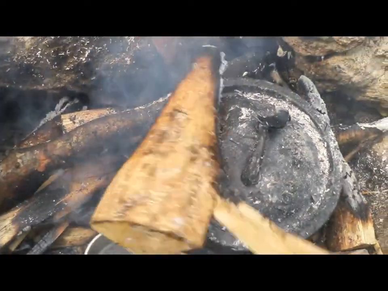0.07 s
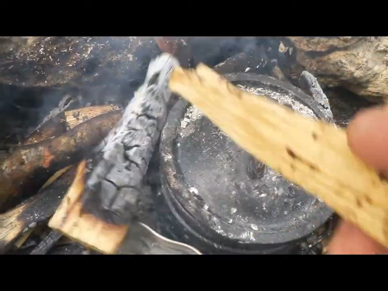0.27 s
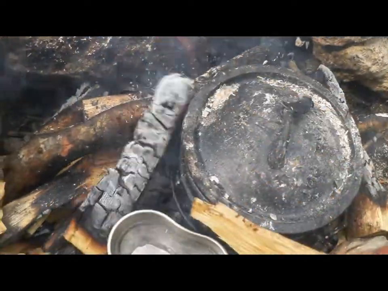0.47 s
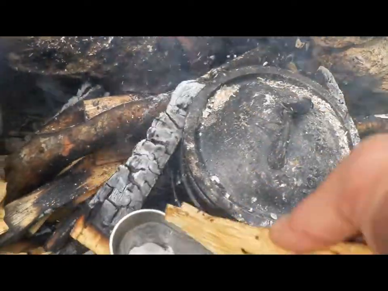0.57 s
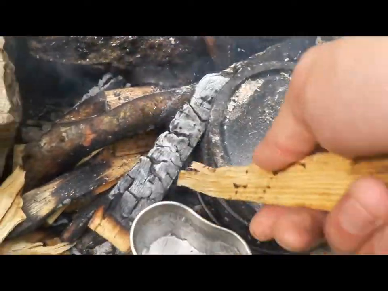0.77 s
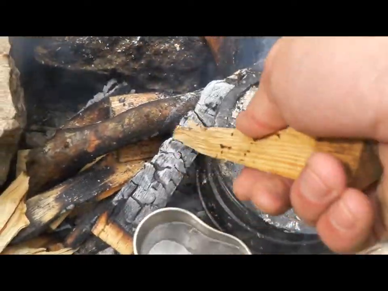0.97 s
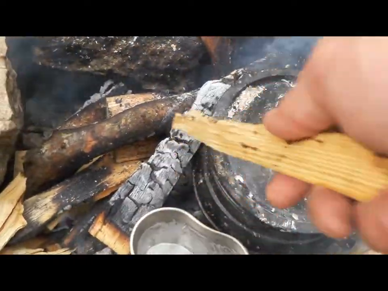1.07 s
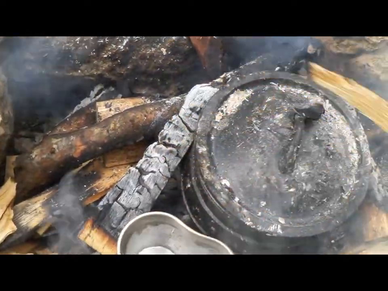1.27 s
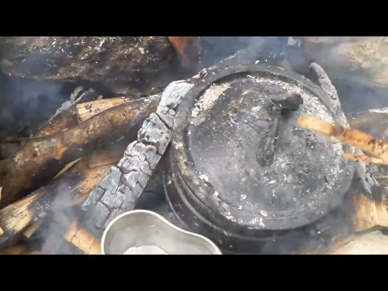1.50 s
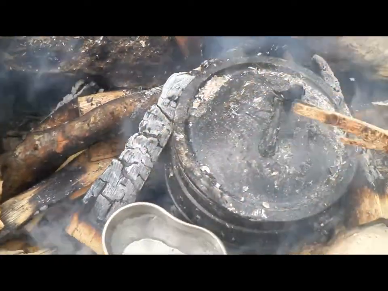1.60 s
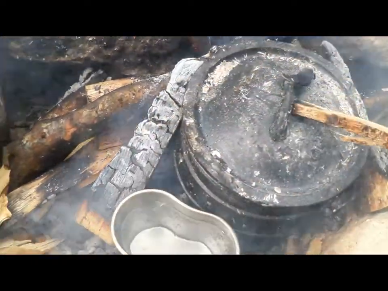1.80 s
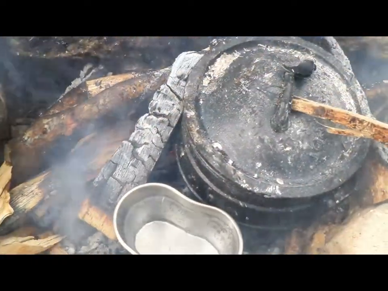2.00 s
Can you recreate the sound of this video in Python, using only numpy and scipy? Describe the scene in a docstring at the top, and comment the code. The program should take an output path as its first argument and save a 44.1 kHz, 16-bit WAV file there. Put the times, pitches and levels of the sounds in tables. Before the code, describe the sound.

Burnt wood scrapes, crunches and knocks against a metal pot in a campfire.

```python
"""A log settles in a campfire

A half-burnt log is pushed over: it scrapes, knocks against a metal pot and settles in the embers.
Each blow rings the wood, crushes a little char and stirs the pot; the hearth stones add a short echo.
Charcoal snaps and ticks, the hand-held microphone takes soft bumps, and an outdoor rush lies behind."""
import sys
import numpy as np
from scipy import signal
from scipy.fft import rfft, irfft
from scipy.io import wavfile

SR = 44100
rng = np.random.default_rng(int(sys.argv[2]) if len(sys.argv) > 2 else 0)


def wrap_up_sound(samples):
    """Save the sound to the file named by the first command line argument, as 16-bit audio."""
    columns = np.atleast_2d(samples).T
    # keep every value between -1 and 1, then stretch to whole-number steps
    tamed = np.clip(columns, -1, 1)
    steps = np.round(tamed * 32767).astype(np.int16)
    wavfile.write(sys.argv[1], SR, steps)


N = 90404


def undb(db):
    """Turn decibels into a number to multiply by."""
    return 10 ** (np.asarray(db) / 20)


def curve(points, x):
    """Gain along straight lines through (x, dB) points."""
    return undb(np.interp(x, *np.array(points).T))


def gains(points):
    """Gain at each frequency, from (Hz, dB) points."""
    hz, db = np.array(points).T
    return undb(np.interp(np.log(np.fft.rfftfreq(2 * N, 1 / SR) + 1), np.log(hz), db))


def colour(x, points):
    """Change the tone of a sound; white noise keeps its power."""
    gain = gains(points)
    cepstrum = irfft(np.log(gain / np.sqrt(np.mean(gain ** 2))))
    cepstrum[1:N] *= 2  # folded so the filter rings only after a sound, never before
    cepstrum[N + 1:] = 0
    return irfft(rfft(x, 2 * N) * np.exp(rfft(cepstrum)))[..., :N]


def spread(pair, width):
    """Make left and right from a mid signal (shared) and a side signal (opposite in each ear)."""
    side = irfft(rfft(pair[1], 2 * N) * gains(width))[:N]
    return np.array([pair[0] + side, pair[0] - side])


def since(start):
    """Seconds since a moment, zero before it."""
    return np.maximum(np.arange(N) / SR - start, 0)


def convolve(x, response):
    """Let every sample set off a ring or an echo."""
    return signal.fftconvolve(np.atleast_2d(x), np.atleast_2d(response), axes=-1)[:, :N]


def ring(modes):
    """The tones of a struck object; each fades by 60 dB in its ring time."""
    t = since(0)[:SR // 2]
    return sum(undb(db - 60 * t / ring_s) * np.sin(2 * np.pi * hz * t) for hz, db, ring_s in modes)


def grains(per_second, spread_db=3.5):
    """Two streams of tiny cracks of uneven size, scaled to a power of 1."""
    size = undb(spread_db * np.clip(rng.standard_normal((2, N)), -2, 2))
    happens = rng.random((2, N)) < per_second / SR
    cracks = happens * np.sign(rng.standard_normal((2, N))) * size
    return cracks / cracks.std()


# tone of the outdoor rush (frequency [Hz], relative level [dB])
RUSH_TONE = [(18, -46), (30, -29.5), (127, -9.5), (319, -6), (355, -11), (486, -10), (684, -8),
             (1630, -3.5), (1810, -7), (2170, -10.5), (3220, -16), (7270, -21), (8080, -24), (14000, -31),
             (16000, -37)]
# how loud the rush is (time [s], level [dB])
RUSH_LEVEL = [(0, -44.5), (.6, -43), (1.2, -43.5), (1.4, -46), (1.65, -45.5), (2.05, -45)]
# brief swells in the rush (peak time [s], half length [s], frequency [Hz], level [dB])
RUSH_SWELLS = [(1.185, 0.11, 1450, -48.5), (1.65, 0.16, 2440, -51)]
# how wide the rush sounds (frequency [Hz], side compared with mid [dB])
RUSH_WIDTH = [(100, -57.5), (600, -14), (1500, -2.5), (4000, -4), (12000, -2)]


def outdoors():
    """A soft, wide rush with short swells at middle pitches."""
    rush = curve(RUSH_LEVEL, since(0)) * colour(rng.standard_normal((2, N)), RUSH_TONE)
    for peak, half_length, hz, db in RUSH_SWELLS:
        noise = colour(rng.standard_normal((2, N)), RUSH_TONE)
        band = signal.lfilter(*signal.iirpeak(hz, Q=2.5, fs=SR), noise)
        rush += undb(db) * np.exp(-((since(0) - peak) / half_length) ** 2) * band / band.std()
    return spread(rush, RUSH_WIDTH)


# rumble of the hand shifting its grip (time [s], level [dB])
GRIP_LEVEL = [(0, -76), (.1, -44.5), (.35, -49), (.65, -41.5), (.9, -42), (1.07, -40), (1.14, -56),
              (1.35, -73), (1.8, -54), (1.9, -76)]
# tone of that rumble (frequency [Hz], relative level [dB])
GRIP_TONE = [(20, -39), (60, -6.5), (120, 2.5), (240, -2.5), (400, -17.5), (760, -15.5), (1200, -46.5)]
# bumps on the microphone's case (time [s], level [dB], pitch at the bump's loudest moment [Hz])
CASE_BUMPS = [(0.109, -32, 142), (0.116, -32.5, 226), (0.158, -33.5, 180), (.215, -40, 252),
              (0.447, -32.5, 206), (.545, -27, 179), (.668, -20.5, 231), (0.676, -23.5, 126),
              (0.719, -47, 198), (.728, -26, 234), (0.74, -35, 110), (0.781, -35.5, 242), (0.85, -22, 259),
              (.863, -17.5, 213), (0.88, -27.5, 313), (.882, -17.5, 137), (0.925, -27, 150),
              (0.954, -25.5, 233), (0.967, -28.5, 116), (0.99, -36, 147), (1.008, -32, 136),
              (1.034, -31, 103), (1.064, -25.5, 218), (1.422, -36.5, 140), (1.544, -43, 135),
              (1.595, -38.5, 166)]


def handling(rise_s=0.0055, pitch_sag=0.09, port_hz=350, port_db=-2):
    """The hand rumbles and bumps on the microphone; its case resonates at the right-hand opening."""
    thuds = curve(GRIP_LEVEL, since(0)) * colour(rng.standard_normal(N), GRIP_TONE)
    for start, db, hz in CASE_BUMPS:
        age = since(start) / rise_s  # 1 at the bump's peak
        cycles = hz * rise_s * age * (1 + pitch_sag) / (1 + pitch_sag * age / 2)
        thuds += undb(db) * (age * np.exp(1 - age)) ** 2 * np.sin(2 * np.pi * cycles)
    right_port = signal.lfilter(*signal.iirpeak(port_hz, Q=1.7, fs=SR), thuds)
    return np.array([thuds, thuds + undb(port_db) * right_port])


# how wide the fire sounds (frequency [Hz], side compared with mid [dB])
FIRE_WIDTH = [(100, -45), (400, -16), (700, 1), (1400, -9), (5000, -10), (9000, -4), (15000, -1)]


def close_by(pair):
    """Spread a sound from the nearby fire between the ears."""
    return spread(pair, FIRE_WIDTH)


# tone of the embers (frequency [Hz], relative level [dB])
EMBER_TONE = [(500, -36), (3000, -1), (8000, 5), (16000, -4)]


def embers(level_db=-67.5):
    """Glowing wood crackles faintly at random."""
    return undb(level_db) * close_by(colour(grains(per_second=70), EMBER_TONE))


# tone of the echo (frequency [Hz], relative level [dB])
ECHO_TONE = [(100, 1), (2500, -8.5), (7000, -14.5), (15000, -8.5)]


def hearth(sound, echo_db=-13, ring_s=0.095, delay_s=0.002):
    """Stones and logs around the fire scatter the sound, adding a short echo."""
    t = since(delay_s)
    tail = rng.standard_normal((2, N)) * (t > 0) * undb(-60 * t / ring_s)
    tail /= np.sqrt(np.sum(tail[0] ** 2))
    echo = close_by(colour(tail, ECHO_TONE))
    return sound + undb(echo_db) * convolve(sound.mean(axis=0), echo)


# charcoal snaps (time [s], level [dB], centre pitch [Hz], pitch spread [octaves], fade time [s])
CHARCOAL_SNAPS = [(0.0502, -26.5, 7900, 1, 0.0029), (0.0565, -29.5, 3630, 0.45, 0.0055),
                  (.079, -32, 9100, 0.51, 0.0024), (0.169, -32, 4500, 0.83, 0.0023),
                  (.229, -21, 4500, 0.53, 0.00091), (.2360, -9.5, 7960, 0.48, .0013),
                  (0.4714, -10, 12200, 1, 0.0015), (.4732, -9.5, 4980, 0.31, 0.00072),
                  (0.4804, -19.5, 6840, 0.58, 0.0011), (0.491, -28, 4600, 0.25, .0015),
                  (0.7814, -16.5, 7600, 0.99, 0.0014), (1.0237, -30.5, 7900, 1, 0.0017),
                  (1.042, -31, 3300, 0.71, 0.0018), (1.084, -37.5, 7460, 0.36, 0.0054),
                  (1.248, -48, 7000, 0.89, .002), (1.263, -45, 7050, 0.94, 0.004),
                  (1.363, -41, 11000, 0.38, 0.0017), (1.6358, -42.5, 12500, 1, 0.0047),
                  (1.664, -38, 12400, 1, 0.0021), (2.003, -39, 11500, 0.72, 0.0018),
                  (2.018, -41, 12000, .5, .0015)]


def charcoal(rise_s=0.00076, body_hz=820, body_db=-3, piece_hz=4920, piece_width_hz=500, piece_db=2.5):
    """Each snap is a quick, bright burst over a weak, dull body; the small pieces share one resonance."""
    out, size = np.zeros((2, N)), SR // 32
    t, hz = np.arange(size) / SR, np.fft.rfftfreq(size, 1 / SR) + 1
    body = undb(body_db) / (1 + (hz / body_hz) ** 2)
    resonance = 1 + undb(piece_db) / (1 + ((hz - piece_hz) / piece_width_hz) ** 2)
    for start, db, centre_hz, octaves, fade_s in CHARCOAL_SNAPS:
        envelope = np.minimum(t / rise_s, 1) * np.exp(-np.maximum(t - rise_s, 0) / fade_s)
        bright = np.exp(-.5 * (np.log2(hz / centre_hz) / octaves) ** 2)
        noise = irfft(rfft(rng.standard_normal((2, size))) * (bright + body) * resonance, size)
        mid, side = undb(db) * envelope * noise / noise.std()
        side *= undb(-8.5 + 8.5 * np.log2(centre_hz / 8000))  # higher snaps sound wider
        i = int(start * SR)
        out[:, i:i + size] += np.array([mid + side, mid - side])[:, :max(N - i, 0)]
    return out


def clumps(spread_db=2.5, step_s=.0015):
    """A jumpy gain: char gives way in uneven spurts of a millisecond or two."""
    t = since(0)
    steps = np.arange(0, t[-1], step_s)
    jumps = np.clip(rng.standard_normal(len(steps)), -1.5, 1.5)
    return undb(spread_db * np.interp(t, steps, jumps))


# the log's slides over ash and bark (time [s], length [s], level [dB])
LOG_SLIDES = [(0.08, 0.078, -38.5), (0.154, 0.032, -33.5), (0.476, 0.056, -34)]


def sliding(rise_share=0.27):
    """Bark grates in a stream of tiny cracks that swells and fades with each slide."""
    envelope = np.zeros(N)
    for start, length, db in LOG_SLIDES:
        envelope += undb(db) * np.interp(since(start) / length, [0, rise_share, 1], [0, 1, 0]) ** .5
    return envelope * grains(per_second=3100)


# tones of the metal pot (pitch [Hz], relative level [dB], ring time [s])
POT_TONES = [(442, -9, .2), (1136, 1, .09), (1645, -1, .1), (2200, 0, .16), (2318, 0, .15), (2536, 0, .13),
             (2752, -2, .11), (3029, -3, .16), (3280, -4, .16), (5162, -2, .12), (5282, -2, .13),
             (5800, -2, .09), (6363, -2, .1), (6694, 4, .1), (6974, 1, .1), (7049, 0, .11),
             (10900, -7, .07)]


def pot(grit, knocks, gain_db=-53):
    """The metal rings when grit and knocks shake it."""
    centred_knocks = np.array([knocks, np.zeros(N)])  # all mid, no side
    return undb(gain_db) * convolve(grit + centred_knocks, ring(POT_TONES))


# tones of a brittle piece of charcoal (pitch [Hz], relative level [dB], ring time [s])
CLINK_TONES = [(5200, 2, 0.2), (6300, -14, .11), (7450, -6, .12), (8900, -2, .07), (14800, 1, .08)]


def clink(start_s=.2362, gain_db=-38):
    """One piece of charcoal gives a thin, glassy ring after a sharp snap."""
    return undb(gain_db) * convolve(signal.unit_impulse(N, int(start_s * SR)), ring(CLINK_TONES))


# the log's blows (time [s], knock level [dB], crunch level [dB], time until the crunch fades [s])
LOG_BLOWS = [(.2908, -11, -19.5, 0.0035), (.2935, -16, -13, 0.0059), (0.3058, -41, -18.5, 0.0031),
             (.318, -19.5, -20.5, 0.0031), (0.339, -36, -29, 0.00081), (0.348, -45, -30, 0.00091),
             (0.3589, -2.5, -17, 0.0025), (0.37, -28, -22.5, 0.0095), (0.393, -46, -25.5, 0.0054),
             (0.472, -20, -21.5, 0.0013), (.5398, -14, -13.5, 0.0012), (0.5426, -23.5, -12.5, 0.0073),
             (0.553, -23, -13.5, 0.0026), (0.572, -31, -29, 0.011), (0.598, -38, -36, 0.0062),
             (0.6172, -21.5, -26, 0.0048), (0.626, -25, -21.5, 0.0032)]


def blows(contact_s=0.00004, rise_s=0.0014, fade_s=0.0058, crunch_gain_db=0.5):
    """Each blow gives one sharp push and crushes char into a burst of tiny cracks."""
    knocks, crush_power = np.zeros((2, N))
    for start, knock_db, crunch_db, length in LOG_BLOWS:
        t = since(start)
        pulse = t * np.exp(-t / (contact_s / 2))
        knocks += undb(knock_db) * pulse / pulse.sum()
        envelope = np.minimum(t / rise_s, 1) * np.exp(-np.maximum(t - length, 0) / fade_s)
        crush_power += (undb(crunch_db) * envelope) ** 2
    return knocks, undb(crunch_gain_db) * np.sqrt(crush_power) * grains(per_second=13000)


# tones of the wooden log (pitch [Hz], relative level [dB], ring time [s])
WOOD_TONES = [(310, -40, 0.055), (464, -5, 0.011), (870, -34, 0.046), (1206, -8, 0.026), (1392, 6, 0.011),
              (1690, -8, 0.03), (2243, -3, 0.022), (2594, -9.5, 0.03), (3453, -4, 0.011)]
# tone of crushed char, the log's burnt crust (frequency [Hz], relative level [dB])
CHAR_TONE = [(60, -23.5), (250, -0.5), (480, -4), (680, -11), (950, -3), (1100, -1.5), (2500, 2.5),
             (4400, -2.5), (5600, 0), (6900, 3), (7700, -3.5), (9500, -7), (10800, -5), (12200, -9),
             (13100, -4.5), (14400, -11), (16000, -12)]
# tone of sliding bark (frequency [Hz], relative level [dB])
BARK_TONE = [(100, 4), (400, -3), (1200, -1.5), (3200, 1), (6500, -2.5), (11000, -8), (16000, -16)]


def log_on_pot(wood_db=-4.5):
    """Knocks ring the wood, char crumbles, bark grates, and all three stir the pot."""
    knocks, crumbs = blows()
    spurts = clumps()
    crunch, scrape = spurts * crumbs, spurts * sliding()
    wood = undb(wood_db) * convolve(knocks, ring(WOOD_TONES))
    metal = pot(crunch + scrape, knocks)
    return wood + close_by(colour(crunch, CHAR_TONE) + colour(scrape, BARK_TONE) + metal)


def scene(left_lead_db=1.45, low_cut_hz=253):
    """The fire is close and slightly to the left; its small pieces give off little bass."""
    fire = hearth(embers() + charcoal() + clink() + log_on_pot())
    fire *= undb(np.array([[left_lead_db], [-left_lead_db]]) / 2)
    fire = signal.lfilter(*signal.butter(2, low_cut_hz, "high", fs=SR), fire)
    return fire + handling() + outdoors()


def record(dry):
    """The recorder flattens peaks beyond full scale and cuts the treble above 15800 Hz."""
    treble_cut = signal.ellip(8, .2, 70, 15800, fs=SR, output="sos")
    return signal.sosfilt(treble_cut, np.clip(dry, -1, 1))


dry = scene()
out = record(dry)
wrap_up_sound(out)
```